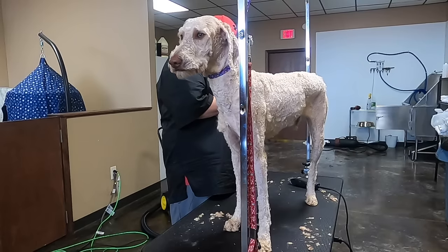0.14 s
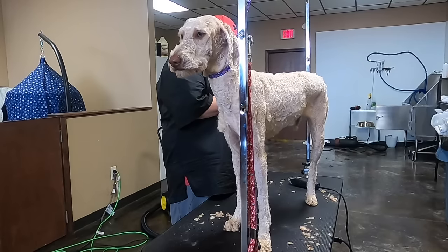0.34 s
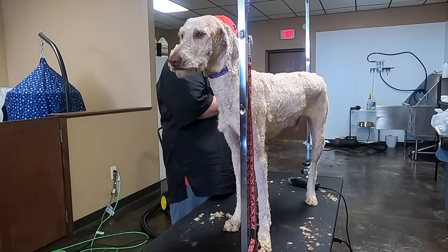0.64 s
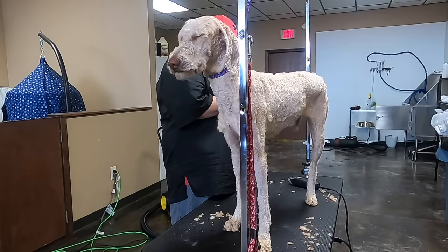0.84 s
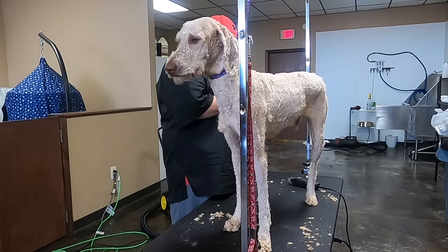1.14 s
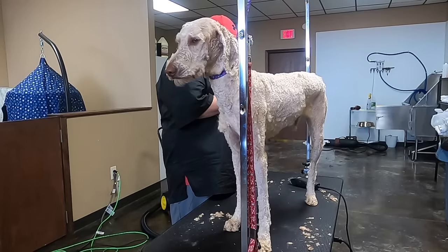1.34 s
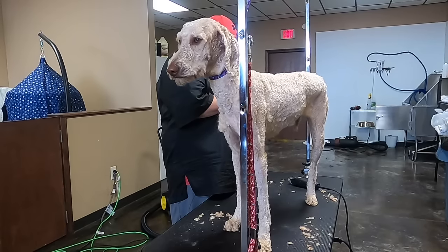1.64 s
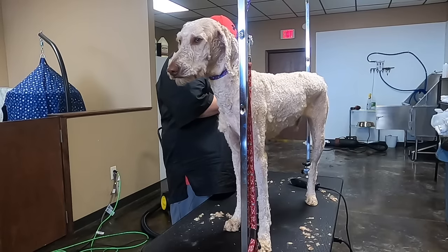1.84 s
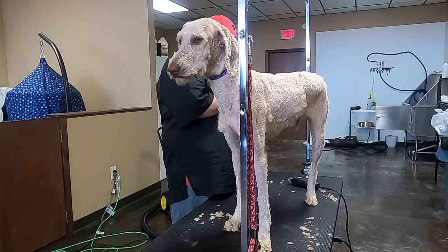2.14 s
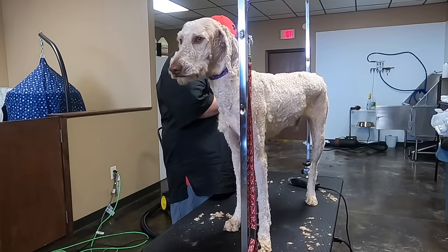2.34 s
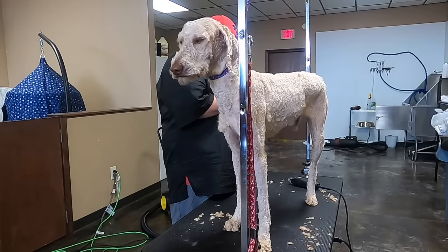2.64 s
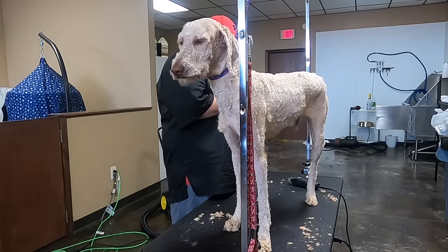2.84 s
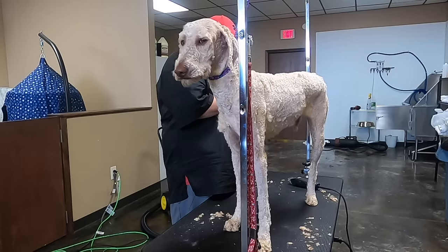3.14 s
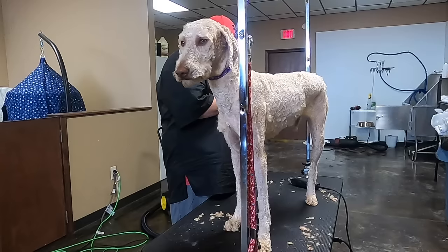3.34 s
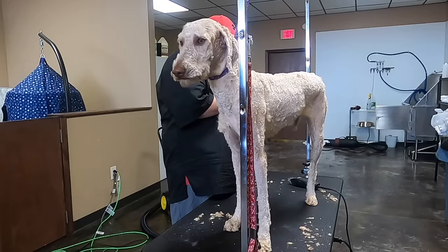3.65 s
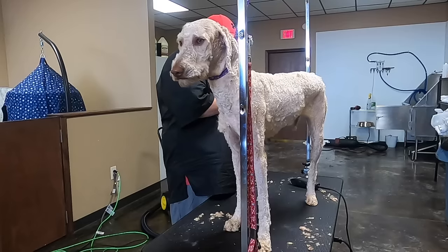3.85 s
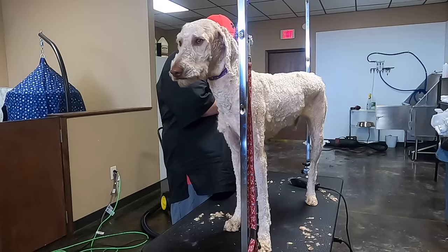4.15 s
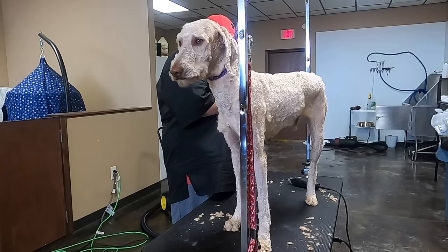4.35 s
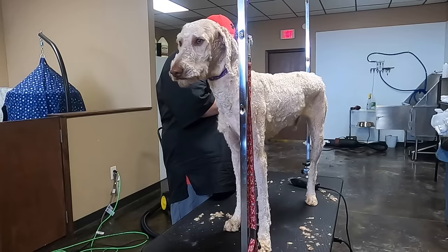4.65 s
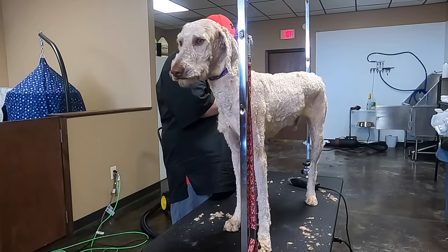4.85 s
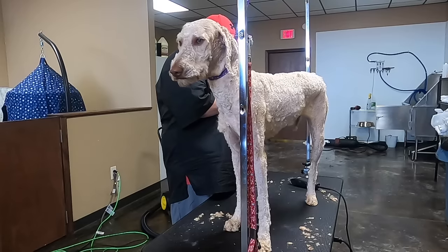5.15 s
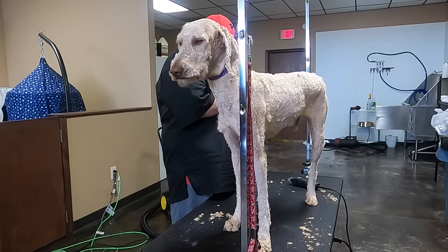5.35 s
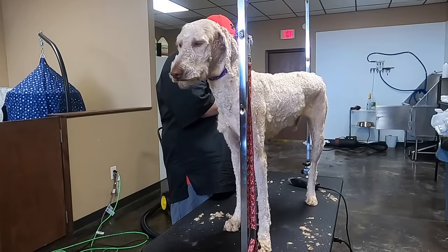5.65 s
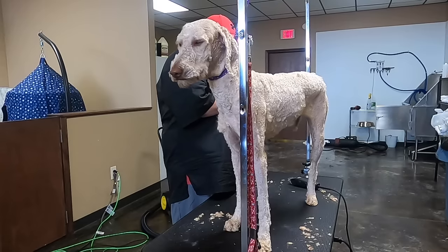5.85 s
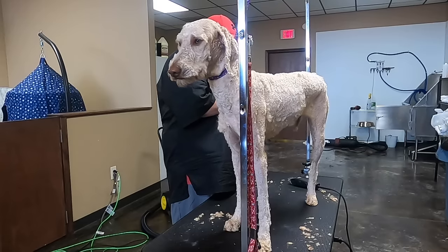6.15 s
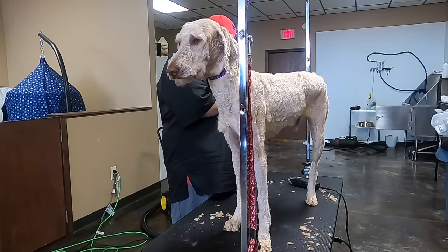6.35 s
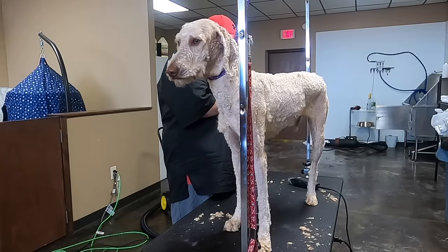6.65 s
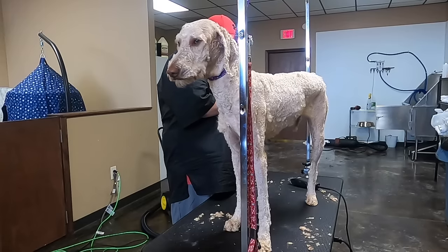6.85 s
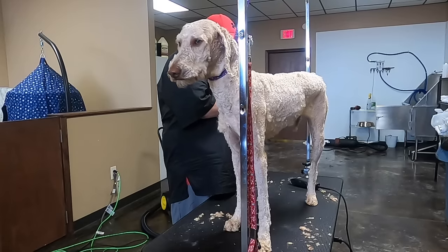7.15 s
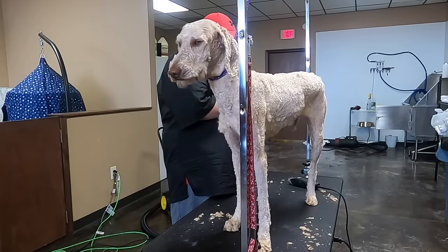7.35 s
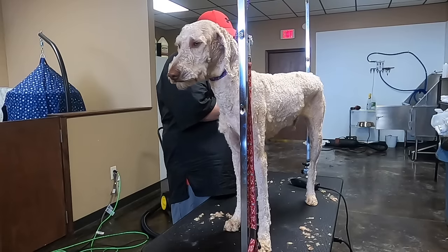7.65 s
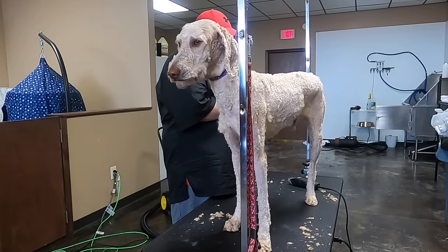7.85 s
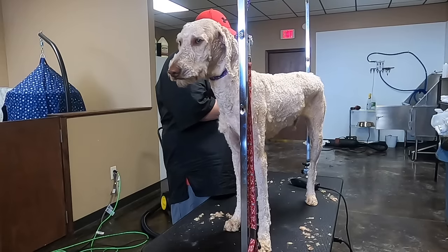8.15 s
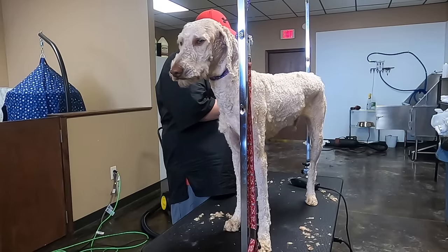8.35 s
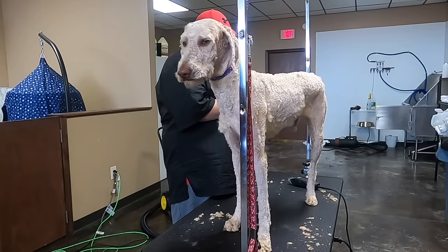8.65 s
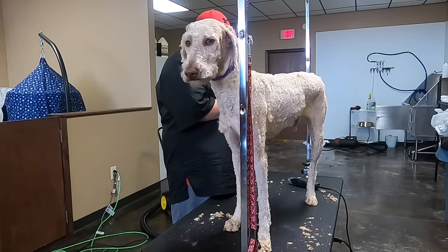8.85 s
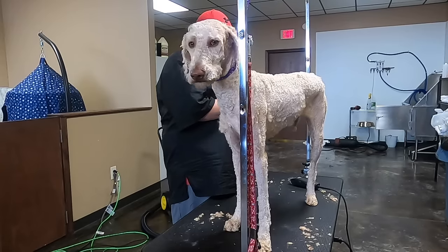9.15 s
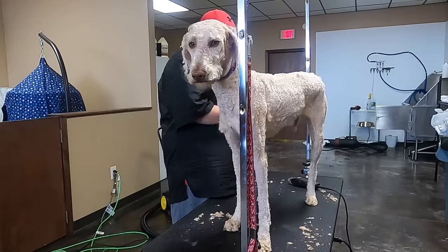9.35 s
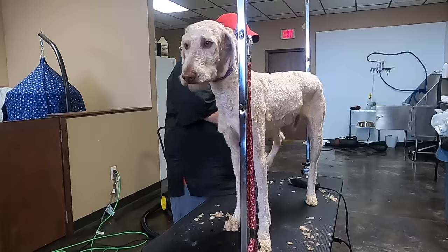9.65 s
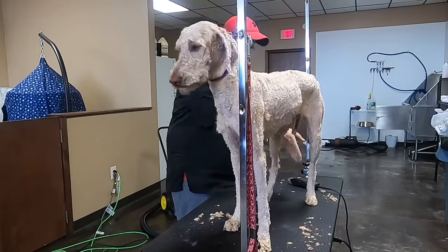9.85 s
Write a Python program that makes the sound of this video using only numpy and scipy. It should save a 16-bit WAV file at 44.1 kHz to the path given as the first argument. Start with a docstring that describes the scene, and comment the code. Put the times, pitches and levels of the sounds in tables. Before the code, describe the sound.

Sharp, irregularly spaced clicks of a dog's toenails being clipped, with faint handle ticks and a steady low room hum.

```python
"""Ventilation motors hum and throb in a hard-floored room, where a groomer clips a big dog's toenails.
Each nail creaks under the blade, then snaps; the steel clipper rings briefly, a low thud follows
and the room answers. Between cuts the tool ticks in the hand, and at the end clothes rustle
as the groomer straightens up."""
import sys
import numpy as np
from scipy import signal
from scipy.fft import rfft, irfft
from scipy.io import wavfile
from scipy.ndimage import uniform_filter1d

SR = 44100
rng = np.random.default_rng(int(sys.argv[2]) if len(sys.argv) > 2 else 0)


def transcribe(signal):
    """Save signal, clipped to [-1, 1], as a 16-bit WAV file at the path in sys.argv[1]."""
    frames = np.atleast_2d(signal).T
    limited = np.clip(frames, -1, 1)
    pcm = np.round(limited * 32767).astype(np.int16)
    wavfile.write(sys.argv[1], SR, pcm)


N = 441000
SHOT = 32768  # samples in which a one-shot dies away

# bed of moving air: (frequency [Hz], relative level [dB])
AIR_COLOUR = [(10, -25), (28, -1.5), (62, 0), (78, -9.5), (105, -7), (330, -10.5), (400, -14.5),
              (750, -29.5), (1250, -28.5), (2200, -40.5), (4500, -49), (8200, -54.5), (9000, -65),
              (15000, -69)]
# boom of the ducts: (frequency [Hz], width [Hz], boost [dB])
DUCT_BOOM = [(191.2, 17.4, 10), (237.7, 8, 8.5), (265.3, 5.3, 7), (308, 22, 5), (350.5, 10, 4.5)]
# hum of motors and mains: (frequency [Hz], rms level [dB])
MOTOR_HUM = [(59.05, -61.5), (107.7, -72), (118.09, -58.4), (120.03, -54.1), (128.67, -59.8),
             (195.76, -63.6), (240.06, -70.4), (257.3, -71)]
# thin whines of the fans: (frequency [Hz], rms level [dB])
FAN_WHINES = [(452.2, -72.5), (592.2, -79), (651.4, -82), (710.6, -78.5), (1007, -84), (1653, -84.5),
              (2008, -91), (2126, -97)]
# rubbing cloth: (frequency [Hz], relative level [dB])
CLOTH_COLOUR = [(500, -15), (1000, -2.5), (2000, 2), (3500, -8), (7000, -11.5), (10000, -28), (14000, -41)]
# swishing folds: (time [s], level [dB], centre [Hz], rise and fall time [s])
FOLD_SWISHES = [(1.677, -70, 2600, .016), (2.72, -80.5, 3200, 0.12), (4.311, -70, 2500, 0.037),
                (9.784, -56, 3070, .008), (9.875, -44, 2440, 0.0089), (9.926, -48.5, 2740, .01),
                (9.968, -49.5, 1390, 0.01)]
# handles ticking between cuts; levels are relative within a column:
# (time [s], level [dB], knock [dB], fizz [dB], knock pitch [Hz])
HANDLE_TICKS = [(0.214, -75, 5, -14, 1900), (1.7405, -78, 11, -21, 1550), (4.106, -67, 4, -17, 1980),
                (4.665, -76, -0.5, -13, 1550), (5.967, -54.5, 1.5, -14.5, 1690),
                (6.1066, -67, -5, -16, 2800), (6.5395, -70, 6.5, -5, 7730), (7.172, -77, -3, -3, 1820),
                (7.291, -57.5, 2.5, -28, 1500), (9.382, -66.5, 0, -11, 1750), (9.5, -78, 9, -10, 1660)]
# one cut a row; levels are relative within a column: (time [s], snap level [dB], knock [dB], fizz [dB],
# thud [dB], knock pitch [Hz], steel tilt [dB/octave], bite length [s], bite level [dB], bite growth [dB])
NAIL_CUTS = [(1.1473, -30, -3.5, -18, -2.5, 1850, -2, 0.024, -52, -6),
             (2.3598, -47, -5.5, -29, 1, 1800, -6, 0.037, -68, 11.5),
             (3.401, -32, -4.5, -18.5, -3, 1790, -2.5, 0.053, -69, 18.5),
             (5.3147, -29, -6.5, -19, -4.5, 1850, -0.5, .045, -67, -1),
             (6.6162, -31, -5.5, -16, -2, 1830, 0, 0.035, -61.5, -2),
             (8.9277, -28, -0.5, -17.5, -5, 1660, -2.5, 0.021, -59, 23)]
# creak of the squeezed nail: (frequency [Hz], width [Hz], boost [dB])
NAIL_CREAK = [(1850, 400, 5.5), (3440, 610, 7)]
# fizz of the bare fracture: (frequency [Hz], relative level [dB])
FRACTURE_FIZZ = [(1000, -41), (5000, -35.5), (8000, -5.5), (9500, -3.5), (11000, -9.5), (13000, -15),
                 (15500, -29)]
# bright ring of the clipper: (frequency [Hz], width [Hz], relative level [dB])
STEEL_MODES = [(2507, 1500, -12), (3500, 720, 5), (4030, 360, -5.5), (4800, 470, -3), (5360, 710, -2),
               (6340, 1600, -1.5), (7330, 1600, 2.5)]
# dull, low ring of the table: (frequency [Hz], width [Hz], relative level [dB])
THUD_MODES = [(310.5, 49, 2.5), (492, 62, 1.5), (590, 190, -4), (866, 185, -4), (1249, 235, 0.5)]
# narrow resonances that ring on after each snap: (frequency [Hz], width [Hz], boost [dB])
SNAP_RESONANCES = [(1595, 35, 5), (1838, 60, 4), (2248, 30, 5), (3240, 30, 3), (3616, 40, 4),
                   (3920, 45, 3.5), (4445, 30, 3.5), (5540, 100, 4), (5982, 40, 5.5), (6299, 30, 4),
                   (6743, 30, 5), (8400, 150, 4)]
# early reflections off table, floor and walls: (delay [s], relative level [dB])
REFLECTIONS = [(.0046, -1), (.0113, -4), (.0137, -5), (.0172, -7), (.031, -11), (.0395, -9)]
# reverb of the room: (frequency [Hz], time to fall 60 dB [s], relative level [dB])
ROOM_TAIL = [(298.4, 0.46, -5), (804, 0.37, 2.5), (1733, 0.41, -7), (2424, .45, 1), (3000, 0.45, -0.5),
             (3700, 0.53, -2), (4500, 0.43, 3), (5830, 0.5, 3.5), (8000, 0.38, -0.5), (13030, 0.33, -1)]
# stereo image of reflected sound: (frequency [Hz], left-right correlation [0-1])
DIFFUSE_IMAGE = [(30, 0.9), (250, 0.95), (600, 0.78), (1400, 0.45), (2400, 0.44), (4400, 0.2), (8000, 0),
                 (14000, 0.2)]
# lean of the treble to either side: (frequency [Hz], left minus right [dB])
STEREO_LEAN = [(300, 0), (1300, -.6), (2500, 1), (3900, .6), (4600, -1.2), (6200, -2), (7700, .7),
               (8600, -5), (9700, -7), (11500, -1.7), (13000, -2.2), (14000, -5)]


def amp(db):
    """Decibels to gain."""
    return 10 ** (np.asarray(db) / 20)


def unit(x):
    """Scales to rms 1."""
    return x / np.sqrt(np.mean(abs(x) ** 2) + 1e-30)


def curve(points, hz, column=1):
    """Reads a column of a table along log frequency."""
    table = np.transpose(points)
    return np.interp(np.log(hz + 1), np.log(table[0] + 1), table[column])


def add(mix, start_s, sound):
    """Lays a stereo sound into the mix."""
    part = mix[:, round(start_s * SR):][:, :sound.shape[1]]
    part += sound[:, :part.shape[1]]


def modes(table, hz):
    """Response of a few damped resonances, at rms 1."""
    return unit(sum(amp(db) / np.sqrt(w) * 1j * hz * w / (f * f - hz * hz + 1j * hz * w)
                    for f, w, db in table))


def boosts(table, hz):
    """Decibels that resonant peaks add to a spectrum."""
    return sum(db / (1 + (2 * (hz - f) / w) ** 2) for f, w, db in table)


def struck(gain):
    """Gives a magnitude spectrum minimum phase: instant attack, then decay."""
    log = np.log(np.maximum(gain, gain.max() * 1e-5))
    phase = -signal.hilbert(np.r_[log, log[-2:0:-1]]).imag[:len(log)]
    return np.exp(log + 1j * phase)


def one_shot(spectrum):
    """Turns a spectrum into a sound that fades to nothing."""
    return irfft(spectrum) * np.clip(np.linspace(3, -1, SHOT), 0, 1)


def spread(pair):
    """Two unrelated signals become a diffuse field: narrow in the bass, wide in the treble."""
    alike = np.clip(curve(DIFFUSE_IMAGE, np.fft.rfftfreq(pair.shape[1], 1 / SR)), -.99, .99)
    mid, side = rfft(pair) * np.sqrt([(1 + alike) / 2, (1 - alike) / 2])
    return irfft([mid + side, mid - side], pair.shape[1])


def ventilation(air_db=-50.5, rumble_hz=90, swell_db=2, swell_hz=5, throb_s=2.42, waver_hz=3):
    """Air rumbles in the ducts and fans whine; motors run just under mains speed, so their hum throbs."""
    hz, t = np.fft.rfftfreq(N, 1 / SR), np.arange(N) / SR
    colour = amp(curve(AIR_COLOUR, hz) + boosts(DUCT_BOOM, hz))
    air = unit(irfft(rfft(spread(rng.standard_normal((2, N)))) * colour, N))
    # turbulence makes the low end swell and sink
    rumble = irfft(rfft(air) / (1 + (hz / rumble_hz) ** 6), N)
    swell = unit(irfft(rfft(rng.standard_normal(N)) / (1 + (hz / swell_hz) ** 4), N))
    air = air + rumble * (unit(amp(swell_db * swell)) - 1)
    # the beating tones swell together at throb_s
    hum = sum(amp(db) * np.sqrt(2) * np.sin(2 * np.pi * f * (t - throb_s)) for f, db in MOTOR_HUM)
    # very narrow bands of noise make the whines waver
    bands = sum(amp(db) * unit(np.exp(-np.minimum(abs(hz - f) / waver_hz, 20))) for f, db in FAN_WHINES)
    whine = irfft(rfft(spread(rng.standard_normal((2, N)))) * bands, N)
    return amp(air_db) * air + hum + whine


def reverb(attack_s=0.0033):
    """Spectrum of the room's dense tail, which blooms quickly and dies band by band."""
    hz, t, noise = signal.stft(rng.standard_normal((2, SHOT)), SR, nperseg=256)
    fall_db = curve(ROOM_TAIL, hz, column=2)[:, None] - 60 * t / curve(ROOM_TAIL, hz)[:, None]
    tail = signal.istft(noise * amp(fall_db), SR, nperseg=256)[1][:, :SHOT]
    attack = 1 - np.exp(-np.arange(SHOT) / SR / attack_s)
    return unit(rfft(spread(tail * attack)))


def early_paths(echo_db=0, left_lag_s=.000045, scatter_s=0.000293):
    """Spectrum of the direct sound, a little from the right, and of its first reflections."""
    hz, lag = np.fft.rfftfreq(SHOT, 1 / SR), np.array([[left_lag_s], [0]])
    paths = np.exp(-2j * np.pi * hz * lag)
    for delay, db in REFLECTIONS:
        shift, angle = rng.standard_normal(2)
        arrival = delay + scatter_s * shift + lag * (1 + angle)
        paths = paths + amp(db + echo_db) * np.exp(-2j * np.pi * hz * arrival)
    return paths


def fibre_grains(colour, grain_db=3, grains_per_s=5000):
    """Fibres catch and let go in tiny grains of the given colour."""
    size = amp(grain_db * np.minimum(rng.exponential(1, (2, SHOT)), 4)) * rng.standard_normal((2, SHOT))
    grains = size * (rng.random((2, SHOT)) < grains_per_s / SR)
    return unit(irfft(rfft(spread(grains)) * colour))


def clothes(rub_s=9.37, rub_db=-72.5, surge_s=9.89, surge_db=-54.5, rise_s=0.063, fall_s=.06, room_db=-6):
    """Clothes rub as the groomer lets go of the paw, then surge and swish on straightening up."""
    out, t, hz = np.zeros((2, N)), np.arange(SHOT) / SR, np.fft.rfftfreq(SHOT, 1 / SR)
    since_peak, middle = rub_s + t - surge_s, t.mean()
    surge = np.exp(np.minimum(since_peak / rise_s, -since_peak / fall_s))
    add(out, rub_s, fibre_grains(amp(curve(CLOTH_COLOUR, hz))) * (amp(rub_db) + amp(surge_db) * surge))
    for s, db, centre_hz, fade_s in FOLD_SWISHES:
        colour = 1 / (1 + (np.log2((hz + 1) / centre_hz) / 0.69) ** 4)  # 0.69 octaves each way
        add(out, s - middle, amp(db) * fibre_grains(colour) / np.cosh((t - middle) / fade_s))
    return out + amp(room_db) * signal.fftconvolve(out, one_shot(reverb()), axes=1)[:, :N]


def crunch(decay_s):
    """Spectrum of a dense burst of tiny cracks, even in colour, that roughens an attack."""
    age = np.arange(SHOT) / SR / decay_s
    burst = rfft(rng.standard_normal(SHOT) * np.sqrt(age) * np.exp(-age))
    return burst / np.sqrt(uniform_filter1d(abs(burst) ** 2, size=200))


def clipper_hit(knock_db, fizz_db, knock_hz, tilt_db=0, knock_width_hz=600, knock_low_hz=1300,
                steel_low_hz=2500, steel_top_hz=8200):
    """Spectrum of one hit in three layers: ringing steel, a pitched knock and the fizz of fracture."""
    hz = np.fft.rfftfreq(SHOT, 1 / SR)
    power = sum(amp(db) ** 2 / w / (1 + (2 * (hz - f) / w) ** 2) for f, w, db in STEEL_MODES)
    power = power / (1 + (hz / steel_top_hz) ** 20) / (1 + (steel_low_hz / (hz + 1)) ** 4)
    steel = unit(np.sqrt(power) * amp(tilt_db * np.log2(hz / steel_low_hz + 1e-3)))
    peak = abs(modes([(knock_hz, knock_width_hz, 0)], hz)) ** 2
    knock = amp(knock_db) * unit(peak / (1 + (knock_low_hz / (hz + 1)) ** 10))
    fizz = amp(fizz_db - 1) * unit(amp(curve(FRACTURE_FIZZ, hz)))
    return struck(np.sqrt(steel ** 2 + knock ** 2 + fizz ** 2))


def handle_ticks(gain_db=23.5):
    """The handles spring open and shift in the hand: light, pitched hits on the same tool."""
    out = np.zeros((2, N))
    spaces = [crunch(decay_s=.0008) * early_paths(echo_db=-7) + reverb() for _ in range(4)]
    for k, (s, db, knock_db, fizz_db, knock_hz) in enumerate(HANDLE_TICKS):
        tick = clipper_hit(knock_db + 0.5, fizz_db, knock_hz,
                           knock_width_hz=800, knock_low_hz=1050, steel_low_hz=1700)
        add(out, s, amp(db) * one_shot(tick * spaces[k % len(spaces)]))
    return amp(gain_db) * out


def blade_bites(gain_db=23.5, slip_gap_s=.009, scatter_s=.002, lead_s=.004):
    """Under the squeeze the blade creaks into the nail in a quick row of slips just ahead of the snap."""
    out, hz = np.zeros((2, N)), np.fft.rfftfreq(SHOT, 1 / SR)
    hit = clipper_hit(knock_db=-4, fizz_db=-18, knock_hz=1850, tilt_db=2)
    slip = unit(hit * struck(amp(boosts(NAIL_CREAK, hz))))
    for snap_s, *_, length_s, db, growth_db in NAIL_CUTS:
        squeeze = np.linspace(0, 1, max(round(length_s / slip_gap_s), 2))
        times = squeeze * (length_s - lead_s) + scatter_s * rng.random(size=16)[:len(squeeze)]
        row = sum(amp(db + growth_db * q) * np.exp(-2j * np.pi * hz * t) for q, t in zip(squeeze, times))
        space = crunch(decay_s=.0012) * early_paths(echo_db=-5) + amp(3) * reverb()
        add(out, snap_s - length_s, one_shot(slip * row * space))
    return amp(gain_db) * out


def nail_snaps(gain_db=19.5, thud_trim_db=-2, thud_delay_s=0.00412, thud_top_hz=1100):
    """A crack runs through the nail with a crunch; a low thud follows just after each snap."""
    out, hz = np.zeros((2, N)), np.fft.rfftfreq(SHOT, 1 / SR)
    body = unit(modes(THUD_MODES, hz) / (1 + 1j * hz / thud_top_hz) ** 2)
    late_body = body * np.exp(-2j * np.pi * hz * thud_delay_s)
    rings = struck(amp(boosts(SNAP_RESONANCES, hz)))
    for s, db, knock_db, fizz_db, thud_db, knock_hz, tilt_db, *_ in NAIL_CUTS:
        snap = clipper_hit(knock_db, fizz_db, knock_hz, tilt_db) * rings
        thud = amp(thud_db + thud_trim_db) * late_body
        # the dog's leg hides the tool, so the treble arrives mostly reflected
        space = crunch(decay_s=.0007) * early_paths() + amp(5.5) * reverb()
        add(out, s, amp(db) * one_shot((snap + thud) * space))
    return amp(gain_db) * out


def scene():
    """Clipper and cloth over the hum of the room."""
    return nail_snaps() + blade_bites() + handle_ticks() + clothes() + ventilation()


def record(dry, cutoff_hz=15600):
    """Colours the treble differently left and right, then cuts the very top steeply."""
    lean_db = curve(STEREO_LEAN, np.fft.rfftfreq(N, 1 / SR))
    impulse = np.fft.fftshift(irfft(amp([lean_db / 2, -lean_db / 2]), N), axes=1)
    coloured = signal.oaconvolve(dry, impulse[:, N // 2 - 128:N // 2 + 129], "same", axes=1)
    lowpass = signal.firwin(511, cutoff_hz, window=("kaiser", 9), fs=SR)
    return signal.oaconvolve(coloured, lowpass[None], "same")


dry = scene()
out = record(dry)
transcribe(out)
```